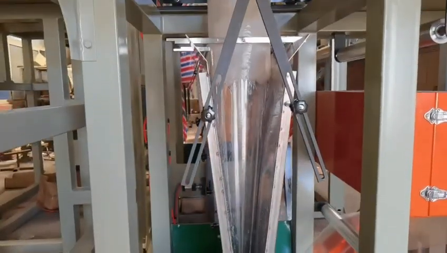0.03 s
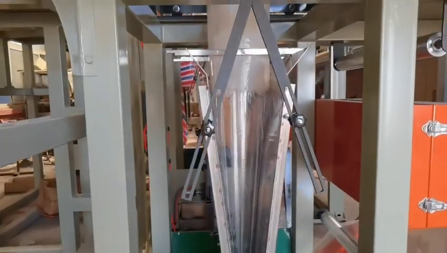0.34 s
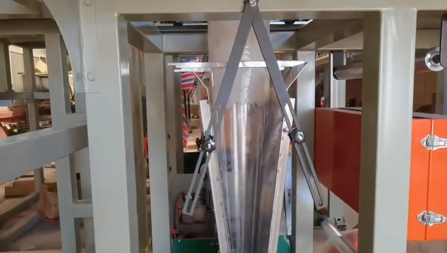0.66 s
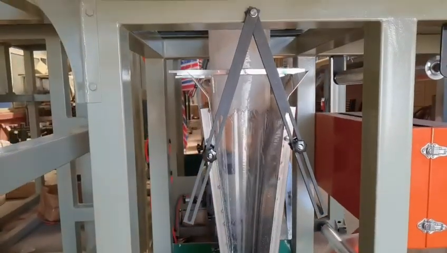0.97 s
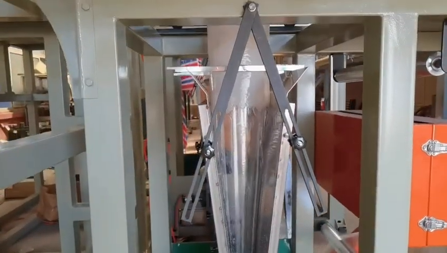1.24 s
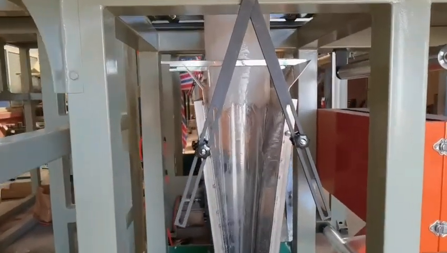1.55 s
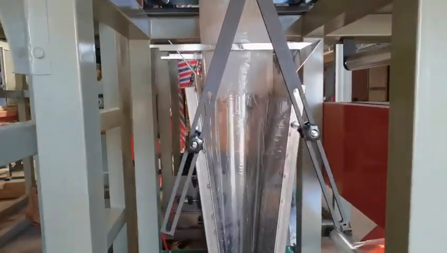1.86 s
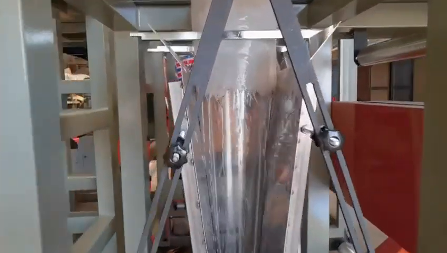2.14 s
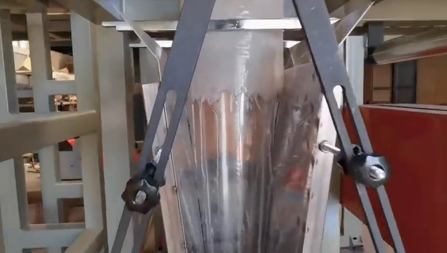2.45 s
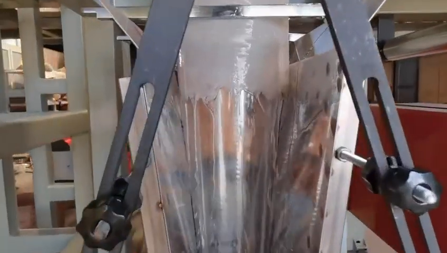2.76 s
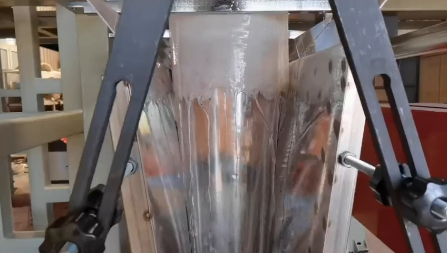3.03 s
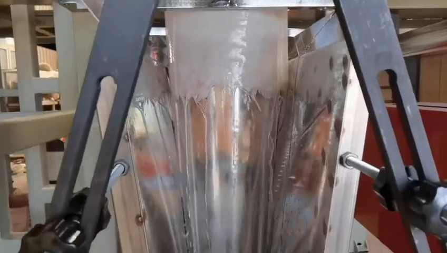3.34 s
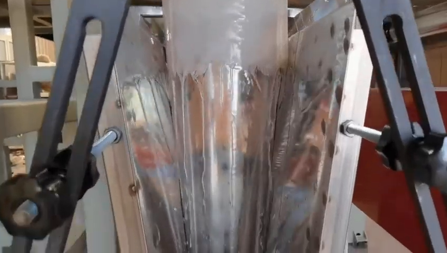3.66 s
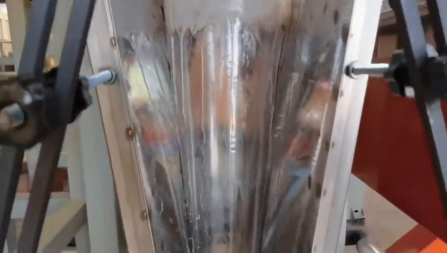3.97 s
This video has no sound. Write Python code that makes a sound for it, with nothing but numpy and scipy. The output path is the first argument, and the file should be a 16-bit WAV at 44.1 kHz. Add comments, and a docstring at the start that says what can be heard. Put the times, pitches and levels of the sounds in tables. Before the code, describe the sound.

A film blowing machine runs in a factory hall, its blower giving a low, throbbing hum with rushing air and a steady high motor whine. A few small metal clacks ring briefly, the two loudest just past the middle.

```python
"""A low hum near 104 Hz swells and fades: the blower of a film blowing machine in a factory hall.
Ducts rumble, cooling air rushes, and other motors and fans add faint tones. An inverter, which feeds
a motor by switching its power very fast, makes that motor whine around 6 kHz; once the whine flares
in a brief squeal. Now and then small metal parts clack together and ring briefly in the hall."""
import sys
import numpy as np
from scipy import signal
from scipy.io import wavfile

SR = 44100
rng = np.random.default_rng(int(sys.argv[2]) if len(sys.argv) > 2 else 0)


def store_wav(level_fs):
    """Save 16-bit WAV to argv[1]."""
    pcm = np.round(np.clip(np.atleast_2d(level_fs), -1, 1) * 32767)
    wavfile.write(sys.argv[1], SR, pcm.T.astype(np.int16))


N = 176400
T = np.arange(N) / SR


def from_db(db):
    """Turn decibels into a gain."""
    return 10 ** (np.asarray(db) / 20)


def unit_power(x):
    """Scale a signal to an average power of 1."""
    return x / np.sqrt(np.mean(x ** 2) + 1e-20)


def in_time(rows):
    """Join (seconds, value) rows with straight lines."""
    return np.interp(T, *np.transpose(rows))


def drift(rate_hz):
    """A smooth random wobble of typical size 1; a higher rate wobbles faster."""
    step = 40  # samples between random values
    pole = np.exp(-2 * np.pi * rate_hz * step / SR)
    slow = signal.lfilter([1], [1, -2 * pole, pole * pole], rng.standard_normal(N // step + 2002))[2000:]
    return np.interp(np.arange(N) / step, np.arange(len(slow)), unit_power(slow - slow.mean()))


def band_noise(hz, width_hz, order=2):
    """Noise in one band around a pitch, at power 1."""
    edges = np.clip([hz - width_hz / 2, hz + width_hz / 2], 10, .48 * SR)
    sos = signal.butter(order, edges, "band", fs=SR, output="sos")
    return unit_power(signal.sosfilt(sos, rng.standard_normal(N + SR // 4))[-N:])


def noise_bands(colour, per_octave=4):
    """Centre pitches and bands of noise that add up to the given colour at power 1."""
    centres = 25 * 2 ** np.arange(0, 9.3, 1 / per_octave)
    widths = centres * np.log(2) / per_octave
    colour_hz, colour_db = np.transpose(colour)
    gains = from_db(np.interp(np.log(centres), np.log(colour_hz), colour_db)) * np.sqrt(widths)
    gains /= np.linalg.norm(gains)
    return centres, np.array([g * band_noise(hz, w, order=3) for hz, w, g in zip(centres, widths, gains)])


def tone(hz, wander_hz):
    """A pure tone of power 1 whose pitch wanders a little."""
    turns = np.cumsum(hz + wander_hz * drift(1.54)) / SR + rng.random()
    return np.sqrt(2) * np.sin(2 * np.pi * turns)


# Colour of the rushing air. Each row: frequency in Hz, relative strength in dB.
AIR_COLOUR = [(30, -17), (100, -0.5), (220, -1), (300, 1), (410, -4.5), (520, -3.5), (750, -5.5),
              (1050, -10), (1600, -15.5), (2100, -16.5), (2900, -21), (4200, -18.5), (5400, -19.5),
              (6700, -20.5), (7500, -30.5), (8200, -39.5), (9500, -40), (11300, -39.5), (12600, -30),
              (14000, -41)]
# How the air rises and falls below and above 700 Hz. Each row: time in seconds, change in dB.
AIR_LOWS = [(0,0.5),(.3,3),(.6,0.8),(1.05,2),(1.75,0),(2.1,0),(2.7,-0.5),(3.3,-1),(4,-3.6)]
AIR_HIGHS = [(0, 0), (1.2, -0.3), (2.0, 0), (2.5, 0.5), (3.3, 0.4), (4, 0.5)]
AIR_DB, AIR_FLICKER_DB = -38, 2.07

def air():
    """Cooling air rushes, each band flickering slightly."""
    lows_db, highs_db = in_time(AIR_LOWS), in_time(AIR_HIGHS)
    return sum(band * from_db(AIR_DB + AIR_FLICKER_DB * drift(6.7) + (highs_db if hz > 700 else lows_db))
               for hz, band in zip(*noise_bands(AIR_COLOUR, per_octave=6)))


# Brief swells of noise; the one at 5990 Hz is the whine's flare.
# Each row: peak time and half length in seconds, pitch and width in Hz, level in dB.
SWELLS_AND_WHINE_FLARE = [(0.384,0.026,1640,500,-50),(1.65,0.061,810,320,-43.5),(1.966,0.078,5990,129,-42),(3.294,0.023,980,240,-46),(3.303,0.21,194,39.8,-42.5),(3.433,0.027,1090,60,-43),(3.988,0.048,1010,160,-41)]

def swells_and_whine_flare():
    """Narrow bands of noise swell and fade, and the whine flares in a brief squeal near 6 kHz."""
    return sum(from_db(db) * np.exp(-((T - peak) / half) ** 2) * band_noise(hz, width)
               for peak, half, hz, width, db in SWELLS_AND_WHINE_FLARE)


# Tones of other motors and fans. Each row: pitch in Hz, level in dB.
MOTOR_TONES = [(48.4,-60.5),(71.8,-56),(264,-58.5),(288,-59.5),(455,-63),(600,-66.5)]
# Loudness of two fan tones. Each row: time in seconds, level in dB.
LOW_FAN_LEVEL = [(0,-68),(.25,-58),(1.25,-57),(1.7,-48),(2,-66),(2.5,-46),(3,-61),(3.5,-68),(3.75,-49.5),(4,-50)]
HIGH_FAN_LEVEL = [(0,-63),(.65,-62),(1.05,-55),(1.9,-68),(2.5,-71),(2.95,-49),(3.2,-59),(3.45,-56),(4,-64)]
LOW_FAN_HZ, HIGH_FAN_HZ = 527, 1096
MOTOR_FLUTTER_DB, FAN_FLUTTER_DB = 5, 3.5

def motors_and_fans():
    """Other motors add faint wavering tones, and two fan tones come and go."""
    motors = sum(from_db(db + MOTOR_FLUTTER_DB * drift(0.88)) * tone(hz, wander_hz=0.98)
                 for hz, db in MOTOR_TONES)
    fans = sum(from_db(in_time(level) + FAN_FLUTTER_DB * drift(8)) * tone(hz, wander_hz=2.08)
               for hz, level in [(LOW_FAN_HZ, LOW_FAN_LEVEL), (HIGH_FAN_HZ, HIGH_FAN_LEVEL)])
    return motors + fans


# The hits within one clack. Each row: delay in seconds before stretching, relative level in dB.
BOUNCES = [(0,-.3),(.006,-2),(.017,-4),(.028,-5.5)]
ATTACK_S, HALL_DB, HALL_FADE_S = .0015, -14, .33  # a fade time is how long a 60 dB drop takes

def bounces(start, stretch, fade_s):
    """Loudness of a quick run of hits: each starts sharply, then fades into the hall's echo."""
    power = 0
    for delay, db in BOUNCES:
        age = np.clip(T - start - stretch * delay, 0, 1)
        attack = np.minimum(age / ATTACK_S, 1)
        decay = np.hypot(from_db(-60 * age / fade_s), from_db(HALL_DB - 60 * age / HALL_FADE_S))
        power += (from_db(db) * attack * decay) ** 2
    return np.sqrt(power)


# The clacks. Each row: start in seconds, level in dB, stretch of the bounce delays, ring pitch and
# width in Hz, relative ring level in dB, ring fade in seconds, relative frame level in dB,
# treble tilt in dB per octave.
CLACKS = [(.475,-42,.55,3380,200,-4.5,.1,-10,-2),(.876,-47.5,.5,2950,500,0,.1,-14,-8),(1.941,-52,1,4300,400,-3,.15,-16,-5),(2.4685,-30.5,1,4860,170,-1.5,.14,-17.5,1),(2.771,-33.2,.95,5250,900,0,.2,-14,.8)]
# Colour shared by the clacks. Each row: frequency in Hz, relative strength in dB.
CLACK_COLOUR = [(500,-12),(1900,-11),(3000,-13),(4200,-4),(5500,-1),(6300,-4),(7100,-2),(7600,-3),(8200,-13),(9300,-17),(11000,-18),(13300,-14),(15000,-17)]
# Notes of the knocked frame. Each row: pitch in Hz, width in Hz, relative level in dB.
FRAME_NOTES = [(1130,120,-2),(1920,200,-1),(2280,200,-2),(2650,140,-3),(3850,250,-3),(4300,250,1)]
CONTACT_FADE_S, FRAME_FADE_S, CHATTER_DB = .07, .12, 2.5

def clacks():
    """Metal parts chatter together for a moment, knock the frame and leave one short ring."""
    centres, bands = noise_bands(CLACK_COLOUR, per_octave=8)
    frame = sum(from_db(db) * band_noise(hz, width) for hz, width, db in FRAME_NOTES)
    out = np.zeros(N)
    for start, db, stretch, ring_hz, width_hz, ring_db, ring_fade_s, frame_db, tilt_db in CLACKS:
        tilt = from_db(tilt_db * np.log2(np.maximum(centres, 1000) / ring_hz))
        chatter = unit_power((tilt @ bands) * from_db(CHATTER_DB * drift(140)))
        contact = chatter * bounces(start, stretch, CONTACT_FADE_S)
        ring = from_db(ring_db) * band_noise(ring_hz, width_hz) * bounces(start, stretch, ring_fade_s)
        knock = from_db(frame_db) * frame * bounces(start, stretch, FRAME_FADE_S)
        out += from_db(db) * (contact + ring + knock)
    return out


def cluster(tones, flutter_db=6):
    """Tones that trade strength among themselves while their total power stays the same."""
    pitches, levels = np.transpose(tones)
    gains = np.array([from_db(db + flutter_db * drift(2.4)) for db in levels])
    gains *= np.linalg.norm(from_db(levels)) / np.linalg.norm(gains, axis=0)
    return sum(gain * tone(hz, wander_hz=1.0) for hz, gain in zip(pitches, gains))


# The whine's central tones, lowest first. Each entry: base level in dB.
CENTRE_DB = [-62, -59, -63, -52.5, -50, -52, -52.5, -55, -53.5, -65, -62.5]
# Tones on either side, and faint ones about an octave up. Each row: pitch in Hz, base level in dB.
OUTER_TONES = [(5289, -67), (5427, -61), (5473, -66), (5520, -65), (5566, -49.5), (5612, -65),
               (5658.6, -57.5), (5705, -52.5), (6296, -57.5), (6342, -63), (6388, -65), (6434, -58.5)]
UPPER_TONES = [(10672,-79),(10695,-78),(11636,-76),(11682,-78),(11777,-81),(11954,-75.5),(12000,-79),(12046,-75.5),(12318,-77),(12365,-74.5)]
# How the three groups swell and fade. Each row: time in seconds, change in dB.
CENTRE_SWELL = [(0,-1.5),(.38,-2),(.52,-1),(.85,-1.3),(1.02,-2),(1.11,-6),(1.28,-0.5),(1.66,-0.5),(1.8,-1),(1.97,-1.5),(2.1,0),(2.28,2.5),(2.68,0),(2.85,2.5),(3.15,0.2),(3.5,0.5),(3.78,1),(4,-1.5)]
OUTER_SWELL = [(0,-1),(.6,-2),(1.1,-0.5),(1.75,-3),(2.2,-2.5),(2.75,-2.5),(3.2,6.5),(3.55,-1.5),(4,-1.5)]
UPPER_SWELL = [(0,0),(.45,1.5),(.8,-3),(1.2,-1),(1.35,3.5),(1.65,-.5),(2,2),(2.25,0),(2.7,5),(2.95,-.5),(3.5,-1.5),(3.9,4),(4,3)]
# Steady hiss around the whine. Each row: pitch in Hz, width in Hz, level in dB.
WHINE_HISS = [(5680,260,-58),(6330,250,-54.5),(7700,120,-76),(10690,130,-74)]
SWITCH_HZ, DRIVE_HZ = 6000, 23.1  # the inverter's switching rate, and the frequency it feeds the motor

def inverter_whine():
    """The inverter's switching makes the motor sing in three groups of tones over a narrow hiss."""
    pitches = SWITCH_HZ + DRIVE_HZ * np.arange(-11, 10, 2)  # odd steps around the switching rate
    centre = cluster([*zip(pitches, CENTRE_DB)]) + from_db(-50.5) * band_noise(SWITCH_HZ, width_hz=320)
    upper = cluster(UPPER_TONES) + from_db(-69.5) * band_noise(2 * SWITCH_HZ, width_hz=510)
    hiss = sum(from_db(db) * band_noise(hz, width) for hz, width, db in WHINE_HISS)
    groups = [(centre, CENTRE_SWELL), (cluster(OUTER_TONES), OUTER_SWELL), (upper, UPPER_SWELL)]
    return hiss + sum(group * from_db(in_time(swell)) for group, swell in groups)


# Loudness of the hum, a higher drone and the duct rumble. Each row: time in seconds, level in dB.
HUM_LEVEL = [(0,-35.5),(.08,-30.5),(.22,-28),(.34,-53),(.42,-28),(.5,-32),(.6,-31.5),(.66,-26),(.8,-28),(.86,-33),(.92,-26.5),(1.06,-22),(1.19,-26),(1.25,-44),(1.34,-49),(1.4,-20),(1.445,-42),(1.49,-23.5),(1.65,-22),(1.84,-26),(2.25,-34),(2.38,-31),(2.56,-41),(2.72,-33),(2.8,-25.5),(2.88,-41),(3.03,-32.5),(3.18,-25),(3.54,-24),(3.64,-38),(3.71,-23.5),(3.8,-39.5),(4,-49)]
DRONE_LEVEL = [(0,-49),(.25,-42),(.55,-48),(.8,-44),(1.1,-44),(1.3,-51),(1.75,-40),(2.05,-40),(2.3,-46),(2.7,-42),(3,-43),(3.25,-40),(3.5,-38),(3.75,-43),(4,-45)]
RUMBLE_LEVEL = [(0,-36.5),(.22,-30.5),(.6,-33),(1.1,-34.5),(1.3,-43),(1.5,-38.5),(2.1,-30.5),(2.6,-36),(3.0,-33),(3.35,-33.5),(4,-31.5)]
# Weaker tones that throb against the hum. Each row: pitch in Hz, average level in dB.
HUM_PARTNERS = [(96.1,-39),(117.3,-41.5)]
# The drone's tones and the rumble's colour. Each row: frequency in Hz, relative strength in dB.
DRONE_TONES = [(141,-2),(155,0),(166,-7),(182,-6),(192,-8),(212,-11)]
RUMBLE_COLOUR = [(25,-50),(36,-42),(47,-34),(65,-18),(85,-2),(105,1.5),(150,4),(190,-6),(230,-9.5),(400,-50.5)]
HUM_HZ, HUM_WANDER_HZ = 104.05, 0.73

def blower():
    """The blower hums and throbs, with a higher drone and the rumble of the ducts around it."""
    hum_db = in_time(HUM_LEVEL)
    hum = from_db(hum_db) * tone(HUM_HZ, HUM_WANDER_HZ)
    partners = sum(from_db(db) * tone(hz, HUM_WANDER_HZ) for hz, db in HUM_PARTNERS)
    partners *= from_db(0.54 * (hum_db - hum_db.mean()))  # they swell about half as much as the hum
    drone = sum(from_db(db) * tone(hz, HUM_WANDER_HZ) for hz, db in DRONE_TONES)
    drone *= from_db(in_time(DRONE_LEVEL))
    _, bands = noise_bands(RUMBLE_COLOUR)
    rumble = from_db(in_time(RUMBLE_LEVEL)) * bands.sum(axis=0)
    return hum + partners + drone + rumble


def scene():
    """The whole machine, heard in one channel."""
    return (blower() + motors_and_fans() + air() + swells_and_whine_flare()
            + inverter_whine() + clacks())[None]


def record(dry):
    """Cut the highest treble steeply, above 14080 Hz."""
    return signal.sosfilt(signal.ellip(12, .1, 80, 14080, fs=SR, output="sos"), dry)


dry = scene()
out = record(dry)
store_wav(out)
```